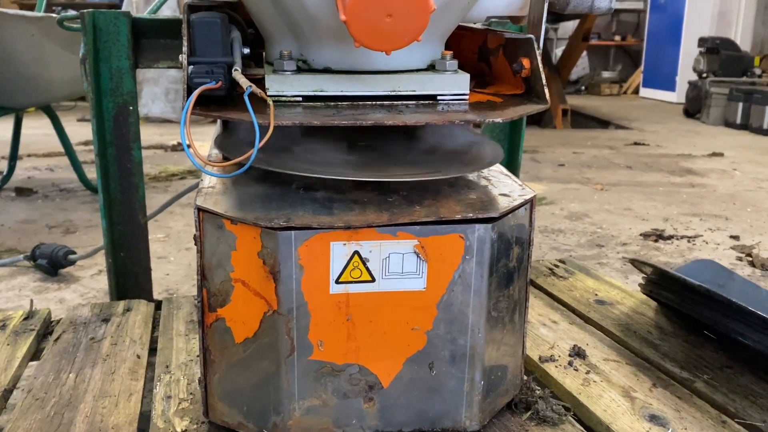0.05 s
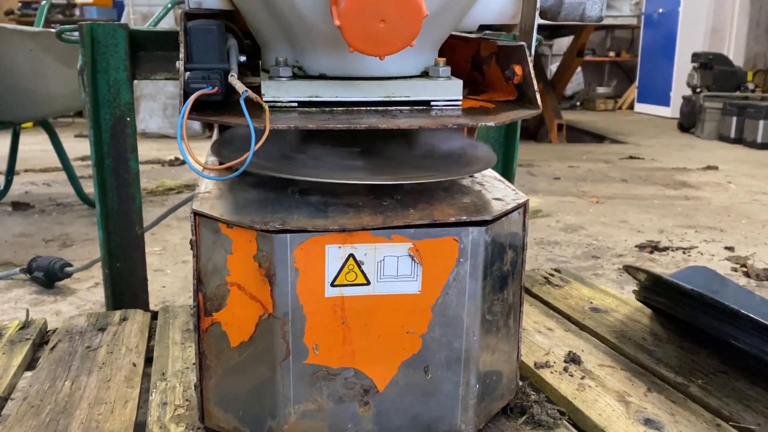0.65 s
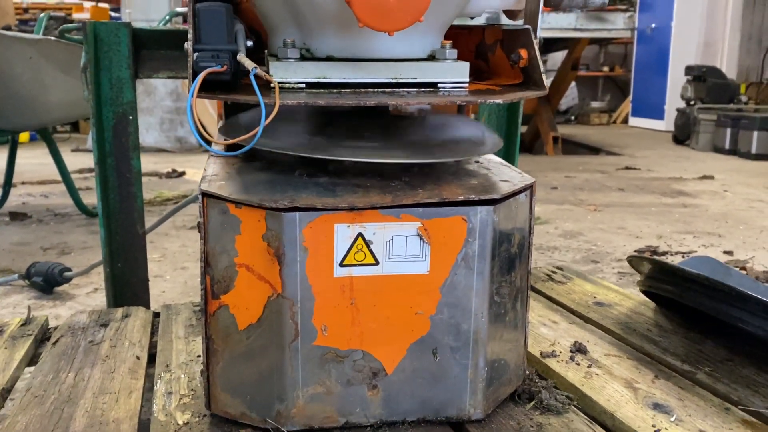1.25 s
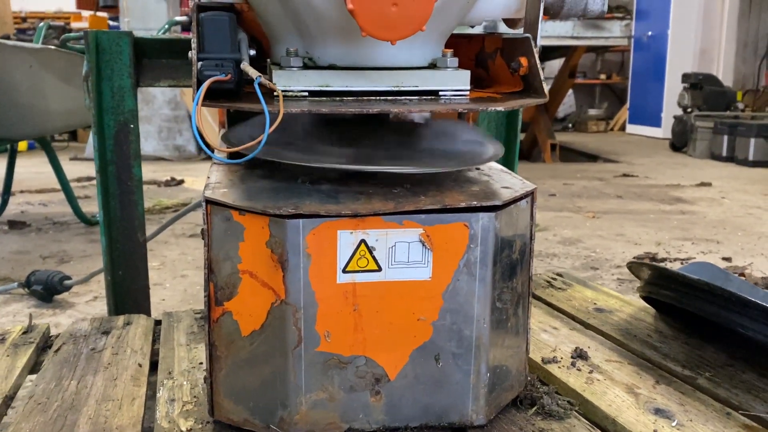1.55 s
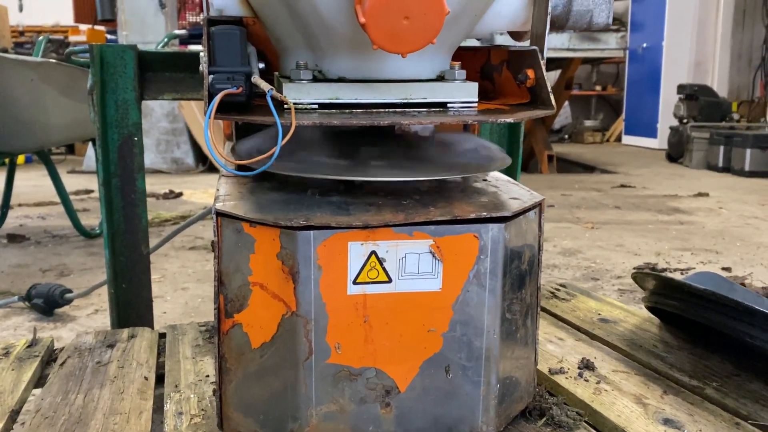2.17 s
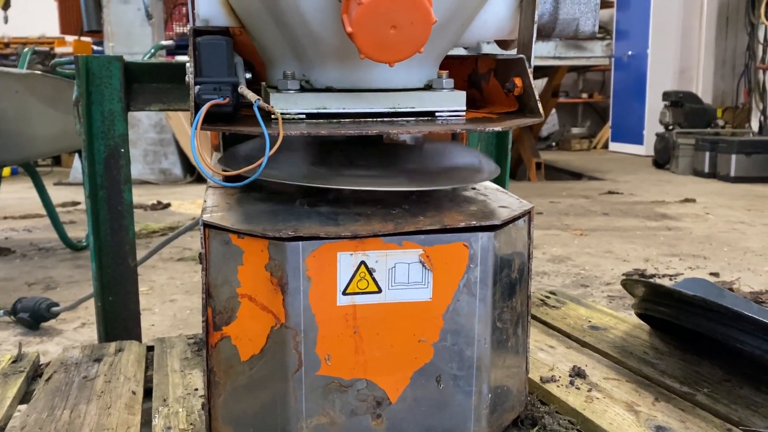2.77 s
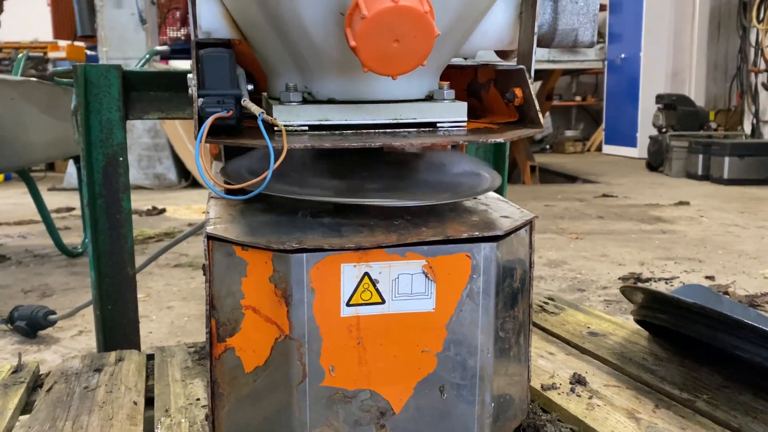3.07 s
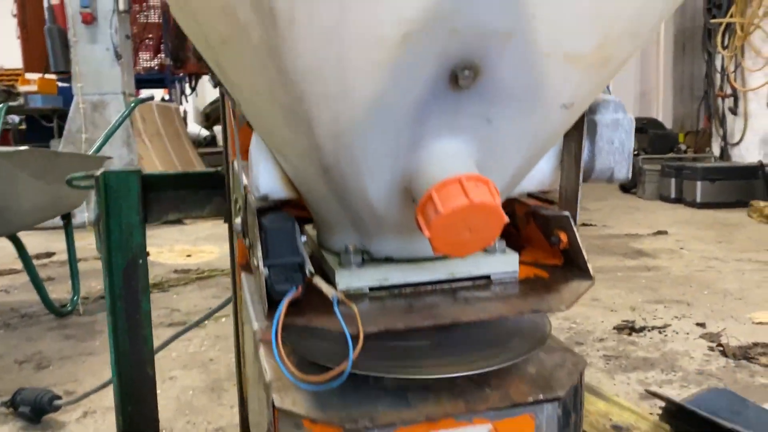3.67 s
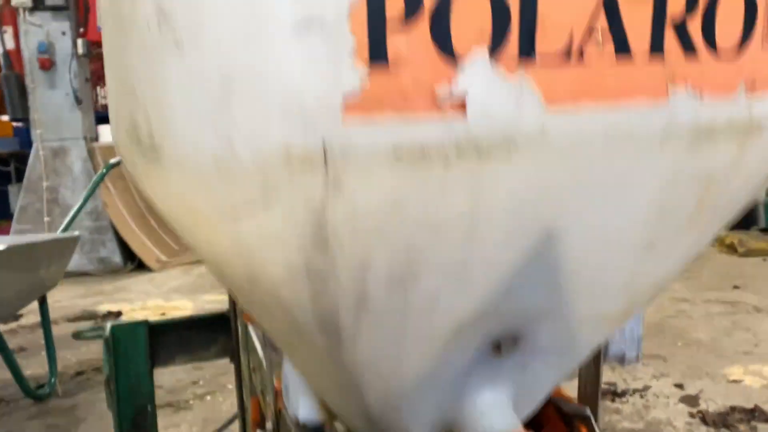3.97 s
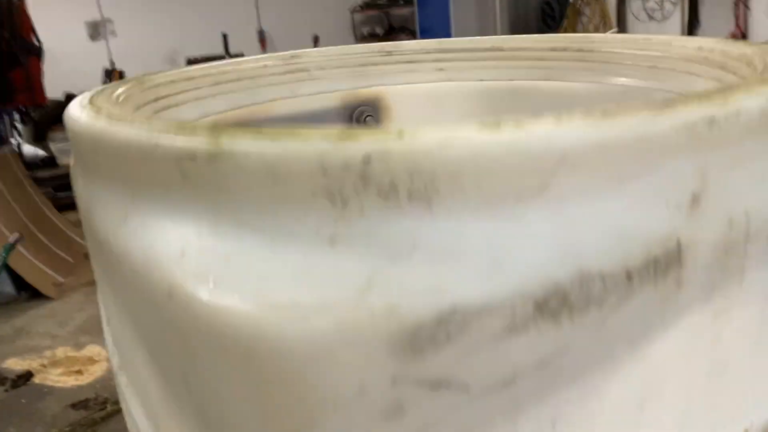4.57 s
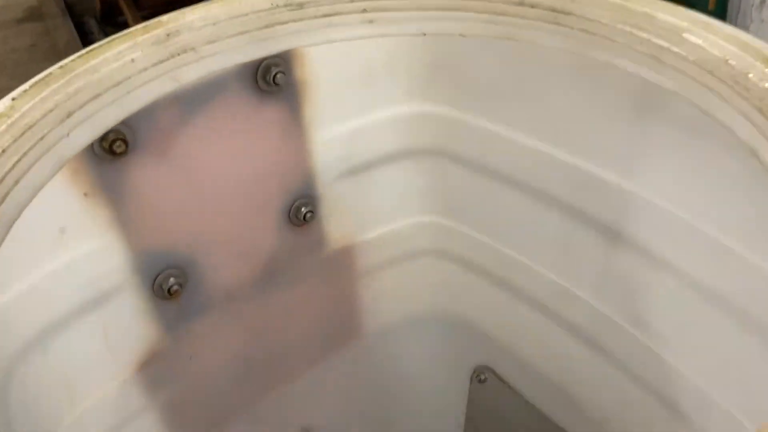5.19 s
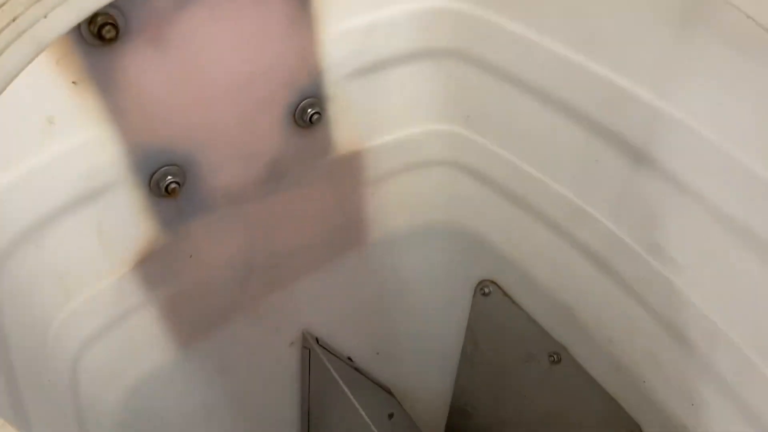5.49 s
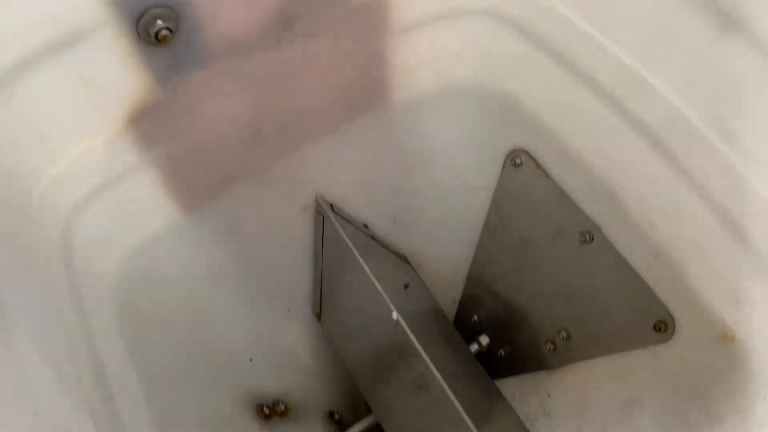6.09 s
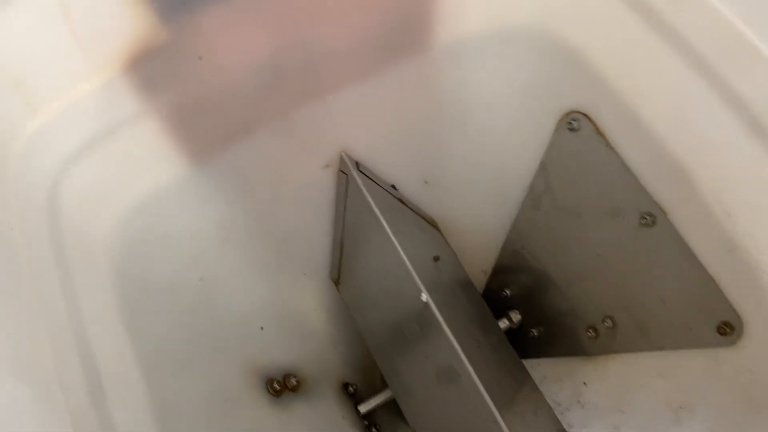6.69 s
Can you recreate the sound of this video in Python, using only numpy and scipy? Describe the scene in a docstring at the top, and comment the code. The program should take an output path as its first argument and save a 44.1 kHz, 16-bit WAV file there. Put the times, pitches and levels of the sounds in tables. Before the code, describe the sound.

A throbbing motor hum and busy metal rattle from a spinning spreader disc, growing louder and ringing over an empty plastic hopper.

```python
"""A throbbing hum and a busy rattle: a motor spins the disc of a spreader in a workshop.
The unbalanced disc shakes the steel frame, the drive chugs and knocks, the bearings hiss and whine,
and now and then a grain of grit ticks on the disc. The microphone starts in front of the steel base,
then rises over the rim of the empty plastic hopper, where hum and rattle boom louder and the air rings."""
import sys
import numpy as np
from scipy import signal
from scipy.fft import rfft, irfft
from scipy.io import wavfile
from scipy.ndimage import uniform_filter1d

SR = 44100
rng = np.random.default_rng(int(sys.argv[2]) if len(sys.argv) > 2 else 0)


def wav_out(sig):
    """Save sig, one row per channel (or a flat mono array), as 16-bit PCM at SR to the path in sys.argv[1]."""
    wavfile.write(sys.argv[1], SR, np.round(np.clip(np.atleast_2d(sig).T, -1, 1) * 32767).astype(np.int16))


N = 306054
T = np.arange(N) / SR
TAPS = 16384
HZ = np.fft.rfftfreq(TAPS, 1 / SR)
IN_STEP_S = .056  # time origin of the drive's swings

# microphone move: t/s, place (0 before the base, 1 by the hopper wall, 2 above its mouth, 3 leaning in)
MIC_PATH = [(3.2, 0.5), (4.1, 1), (4.65, 1.72), (5.2, 2.5), (6.1, 2.5), (6.48, 3)]
# partials of the hum: f/Hz, relative level in front/dB, relative level over the hopper/dB
HUM_LINES = [(50.6, 0, -36), (53.6, -4.5, -16.5), (69.5, -0.5, -3.5), (78.2, 0.5, -1), (83.3, -10.5, -13),
             (86.6, 0, -15), (90, -8, -11), (100.8, -14, -12.5), (116.5, -5.5, -11)]
# partials of the frame's drone: f/Hz, relative level/dB
DRONE_LINES = [(172.6, -12), (232.7, -10), (239.7, 0), (248.6, -12)]
# the drone's fader: t/s, level/dB
DRONE_FADER = [(.1, -33), (.8, -31.5), (1.05, -38.5), (1.35, -35), (1.85, -41), (2.15, -37.5), (3.8, -34),
               (4.1, -29), (4.35, -36), (4.62, -30.5), (5.1, -48), (6.8, -36.5)]
# the motor speeds up and slows down: t/s, lead/turns
MOTOR_LEAD = [(0, -.2), (.55, -.45), (1.6, .1), (2.35, -.1), (2.8, .07), (3.15, .5), (3.5, .73), (4.1, .77),
              (4.5, 1.15), (5.05, 1.33), (5.45, 1.93), (6.65, 1.85), (6.94, 1.9)]
# steady chug of the drive: t/s, depth/dB
CHUG_DEPTH = [(.9, 2.8), (2.5, 1.8), (4.4, 2.8), (5.6, 3.3), (6, 4.5), (6.9, 3.2)]
# faster force swings (negative flips them): f/Hz, multiple of motor lead, knock/dB, chatter/dB
SWINGS = [(26.6, 1, -1.2, -2.2), (38.67, 1, 1.7, 1.2), (53.2, 1, 1.7, 2), (65.27, 1, 2.1, .7),
          (118.47, 2, .9, .9)]
# broad tone of the steel frame and the plastic hopper: f/Hz, gain/dB
FRAME_BODY = [(30, -42), (80, -19), (150, -3), (300, -2.5), (550, -1.5), (1000, -2.5), (1280, -4.5),
              (1470, -11.5), (2100, -10), (2850, -10), (3200, -17), (5200, -15.5), (8300, -33),
              (15500, -35)]
HOPPER_BODY = [(30, -31.5), (80, -4.5), (150, -19.5), (300, -11.5), (550, -17.5), (1000, -15.5),
               (1280, -34), (1470, -29), (2100, -20.5), (2850, -26.5), (3200, -40), (5200, -51),
               (8300, -60), (15500, -69)]
# their resonances and notches: f/Hz, width/Hz, boost/dB
FRAME_MODES = [(173, 16, 11.5), (239, 26, 12), (268, 14, 10), (314, 30, 12), (347, 14, 9), (466, 14, 7),
               (686, 32, 9.5), (770, 22, 7), (951, 18, 8.5), (970, 108, 4.5), (1065, 10, 7),
               (1179, 53, 7.5), (1624, 50, 10), (2050, 150, 5.5), (2510, 110, 4.5), (3050, 130, -5),
               (7700, 900, 4.5), (11200, 830, 7)]
HOPPER_MODES = [(171, 14, 14), (232, 40, 7), (305, 45, 10), (414, 22, 16), (465, 18, 13), (592, 16, 10),
                (647, 16, 11), (710, 28, 11), (750, 26, 7), (819, 28, 7), (868, 44, 8), (960, 34, 8),
                (1097, 35, 10), (1184, 58, 20.5), (1272, 56, 17), (1338, 84, 19), (1984, 55, 12.5),
                (2425, 34, 7), (2550, 40, 4), (2673, 50, 6), (3510, 130, 6)]
# resonances heard near the hopper wall: f/Hz, width/Hz, level/dB
WALL_MODES = [(333, 53, -39.5), (720, 126, -40), (4820, 780, -51.5)]
# bearing whines: f/Hz, width/Hz, level/dB, loudest place, reach/places
WHINES = [(3290, 90, -60, .2, 1), (3520, 80, -57.5, .9, 2.2), (4940, 80, -59, .5, 1),
          (7680, 380, -58, 2.8, .55)]
# heavier knocks and clinks of the drive: t/s, f/Hz, level/dB
KNOCKS = [(.443, 1950, -33), (.452, 720, -30), (1.157, 960, -27), (1.562, 2140, -33), (1.673, 945, -24),
          (2.806, 1980, -31), (4.457, 2700, -31), (4.519, 718, -16.5), (4.607, 715, -23), (4.917, 825, -24),
          (5.332, 840, -16), (5.38, 735, -17), (6.512, 770, -18), (6.569, 725, -13.5), (6.608, 2840, -26),
          (6.83, 1990, -23)]
# grit hitting the disc: t/s, level/dB
GRIT_HITS = [(.4474, -29), (.8071, -21), (2.0919, -17), (2.2130, -24), (3.6024, -32.5), (4.0706, -33.5)]
# the grit's bright tone: f/Hz, gain/dB
GRIT_EQ = [(1000, -14), (3500, 0), (15000, 1.5)]
# single pitches flaring in the rattle: middle t/s, length/s, f/Hz, width/Hz, level/dB
FLARES = [(1.593, 0.36, 2230, 550, -42), (3.316, 1, 2520, 620, -44.5), (3.563, 0.72, 343, 36, -36),
          (3.935, 0.194, 411, 28, -32.5), (4.077, 0.25, 3520, 170, -49), (4.126, 0.28, 766, 40, -33),
          (5.14, 0.59, 1178, 26, -31)]
# brief dips of rattle and hopper notes: middle t/s, length/s, gain/dB
LULLS = [(2.163, 0.038, -2.5), (3.86, 0.12, -1.5), (4.5, 0.03, -4), (4.9, 0.043, -2.5), (5.645, .05, -2),
         (6.845, 0.18, -2.5)]
# notes of the hopper's air, a swing's rate apart: f/Hz, multiple of motor lead, relative level/dB
HOPPER_NOTES = [(711.03, -1, -1.5), (749.7, 0, -1), (814.97, 1, -2.5)]
# their fader: t/s, level/dB
HOPPER_FADER = [(3.7, -65), (4.3, -39), (4.62, -33.5), (5.8, -28), (6.55, -23), (6.9, -27)]
# resonances deep in the hopper: f/Hz, width/Hz, level/dB, place where they open
INNER_MODES = [(310, 53, -31.5, 2.68), (2800, 200, -39, 2.8), (10500, 3000, -61, 2.7)]
# stereo width, widest in the hiss: f/Hz, side level against the middle/dB
STEREO_WIDTH = [(110, -18.5), (200, -13), (380, -11), (700, -4), (1290, -4.5), (2380, -3), (4400, -2),
                (8000, 1)]
# panning of frame and hopper: f/Hz, left minus right/dB
FRAME_PAN = [(700, -0.5), (1300, 1), (4400, 4), (8000, 0.5)]
HOPPER_PAN = [(380, 0.23), (700, 6.8), (1300, 1.4), (4400, 0.33)]


def amp(db):
    """Decibels to gain."""
    return 10 ** (np.asarray(db) / 20)


def unit_rms(x):
    """Scales to an rms of 1."""
    return x / np.sqrt(np.mean(x ** 2) + 1e-20)


def curve(rows):
    """Automation: straight lines through (t/s, value) rows."""
    return np.interp(T, *np.transpose(rows))


def eq(points):
    """Joins (f/Hz, gain/dB) rows on a log-frequency axis."""
    hz, db = np.transpose(points)
    return np.interp(np.log(HZ + 1), np.log(hz), db)


def arch(s, length):
    """A swell from 0 to 1 and back, peaking at time s."""
    return np.cos(np.pi * np.clip((T - s) / length, -.5, .5))


def drift(rate_hz):
    """Smooth random modulation of rms 1."""
    coarse = T[::64]
    hz = np.fft.rfftfreq(len(coarse), coarse[1])
    spectrum = rfft(rng.standard_normal(len(coarse))) * np.exp(-(hz / rate_hz) ** 2) * (hz > 0)
    return np.interp(T, coarse, unit_rms(irfft(spectrum, len(coarse))))


def band(x, edge_hz, kind):
    """Steep causal filter."""
    return signal.sosfilt(signal.butter(6, edge_hz, kind, fs=SR, output="sos"), x)


def ring(x, db):
    """Minimum-phase EQ with the gain curve db: its peaks ring after each blow."""
    log_gain = np.log(amp(np.r_[db, db[-2:0:-1]]))
    response = np.fft.ifft(np.exp(np.conj(signal.hilbert(log_gain)))).real
    return signal.oaconvolve(x, response[:TAPS // 2])[:N]


def tone(hz, wander, waver_db):
    """A partial that wanders in phase (turns) and wavers in level."""
    strength = amp(waver_db * drift(rate_hz=5))
    return strength * np.cos(2 * np.pi * (hz * T + rng.random() + wander * drift(rate_hz=.92)))


def resonance(shake_db, hz, width):
    """Noise ringing at one pitch, its level shaken by shake_db."""
    peak_db = -20 * np.log10(1 + 2 * ((HZ - hz) / width) ** 2)
    return unit_rms(ring(rng.standard_normal(N), peak_db) * amp(shake_db))


def past(place, blur):
    """Fades from 0 to 1 as the microphone passes a place."""
    return 1 / (1 + np.exp((place - curve(MIC_PATH)) / blur))


def near(place, reach):
    """Nearness of the microphone to a place, 0 to 1."""
    return np.exp(-((curve(MIC_PATH) - place) / reach) ** 2)


def over_rim():
    """Crossfade from frame (0) to hopper (1)."""
    return past(1.69, blur=.26)


def by_wall():
    """Nearness to the hopper's outer wall, 0 to 1."""
    return near(1, reach=.47)


def mic_gain(front_db, mouth_db, lean_db):
    """A layer's gain: steady in front, growing past the rim as the microphone leans in."""
    over = over_rim()
    inside_db = mouth_db + lean_db * (curve(MIC_PATH) - 2)
    return amp((1 - over) * front_db + over * inside_db)


def disc_hum():
    """The unbalanced disc shakes the frame; the hopper's air favours the partials near 77 Hz."""
    over = past(1.9, blur=.12)
    gains = np.array([amp(front + (top - front) * over) for _, front, top in HUM_LINES])
    partials = np.array([tone(hz, wander=.05, waver_db=1.1) for hz, _, _ in HUM_LINES])
    hum = unit_rms((gains * partials).sum(0) / np.linalg.norm(gains, axis=0))
    spot_db = 3 * by_wall() - 3.5 * near(2.01, reach=.42)  # the wall radiates; the rim has a quiet spot
    return mic_gain(front_db=-39.5, mouth_db=-31.5, lean_db=13.5) * amp(spot_db) * hum


def frame_drone():
    """The frame sings along with the drive, swelling and sinking."""
    partials = sum(amp(db) * tone(hz, wander=.12, waver_db=1.8) for hz, db in DRONE_LINES)
    return amp(curve(DRONE_FADER)) * unit_rms(partials)


def drive_force(chug_hz=12.07):
    """Contact force in dB, for knock and chatter: a steady chug plus swings that follow the motor."""
    t, lead = T - IN_STEP_S, curve(MOTOR_LEAD)
    chug = curve(CHUG_DEPTH) * np.cos(2 * np.pi * chug_hz * t)
    chug_db = np.outer([1, .25], chug)  # the chatter gets a quarter of the chug
    swing_db = sum(np.outer(depths_db, np.cos(2 * np.pi * (hz * t + k * lead)))
                   for hz, k, *depths_db in SWINGS)
    return chug_db + swing_db + .13 * drift(rate_hz=9)


def contacts(knock_db, chatter_db, firm):
    """One soft scuff at each crest of the force, amid many small touches."""
    crests = signal.argrelmax(knock_db)[0]
    jitter = rng.normal(0, .00035 * SR, len(crests)).astype(int)
    blows = np.zeros(N)
    blows[np.clip(crests + jitter, 0, N - 1)] = amp(.4 * knock_db[crests])
    # sheet metal carries highs faster than lows, so each blow smears into a falling sweep
    t = T[:round(.012 * SR)]
    sweep = signal.chirp(t, 1500, t[-1], 300) * signal.windows.tukey(len(t))
    scuffs = unit_rms(signal.oaconvolve(blows, sweep, "same"))
    touches = rng.standard_normal(N)
    lows = unit_rms(band(touches * amp(.44 * knock_db), 1372, "low"))
    highs = unit_rms(band(touches * amp(.17 * chatter_db), 1726, "high"))
    return unit_rms(firm * scuffs + lows) + 3.04 * highs


def wall_ripple(depth_db=2, centre_hz=1800):
    """A wall's many small resonances, as random EQ peaks and dips in dB."""
    log_hz, grid = np.log(HZ + 1), np.arange(0, np.log(SR), .012)
    heights = unit_rms(np.interp(log_hz, grid, rng.standard_normal(len(grid))))
    return depth_db * heights * np.exp(-(log_hz - np.log(centre_hz)) ** 2)


def throb(x, edges_hz, db):
    """Pumps one band of x by db."""
    part = signal.sosfiltfilt(signal.butter(3, edges_hz, "band", fs=SR, output="sos"), x)
    return x + part * (amp(db) - 1)


def rattle(knock_db, chatter_db, body, modes, firm, press):
    """Contacts ring one part of the machine; on top, the bearings hiss through the same part."""
    modes_db = sum(boost / (1 + (2 * (HZ - hz) / width) ** 2) for hz, width, boost in modes)
    colour_db = eq(body) + wall_ripple() + modes_db
    blows = band(ring(contacts(knock_db, chatter_db, firm), colour_db), 3570, "low")
    # the walls sound louder while the parts press together
    blows = throb(blows, [620, 980], press * knock_db)
    blows = throb(blows, [1800, 3200], .66 * chatter_db)
    blows /= np.std(band(blows, [280, 3200], "band"))
    blows *= amp(.5 * by_wall() + 1.5 * arch(2.55, length=1.76) + lulls())
    flutter = rng.standard_normal(N) * amp(1.2 * drift(rate_hz=46))
    hiss = unit_rms(band(ring(flutter, colour_db), 3695, "high"))
    return (mic_gain(front_db=-31, mouth_db=-26, lean_db=5) * blows
            + mic_gain(front_db=-51, mouth_db=-49, lean_db=2.5) * hiss)


def floor_echo(x):
    """The floor's echo lags more as the microphone rises, sweeping a comb down the sound."""
    delay_s = .001466 + .0016 * curve(MIC_PATH)
    gain = .97 * over_rim()
    return (x + gain * np.interp(T - delay_s, T, x)) / np.sqrt(1 + gain ** 2)


def workshop(x, t60):
    """Short, dense reverb from floor, benches and walls."""
    t = T[:TAPS]
    tail = rng.standard_normal(TAPS) * amp(-60 * t / t60) * (t > .002)
    return signal.oaconvolve(x, tail / np.linalg.norm(tail))[:N]


def stereo(middle, pan_db):
    """A diffuse side signal widens the image; pan_db tilts each frequency left or right."""
    side = ring(workshop(middle, t60=.14), eq(STEREO_WIDTH))
    return np.array([ring(middle + side, pan_db / 2), ring(middle - side, -pan_db / 2)])


def wall_ring(chatter_db):
    """The chatter rings the hopper's wall, loudest as the microphone passes it."""
    return by_wall() * sum(amp(db) * resonance(chatter_db, hz, width) for hz, width, db in WALL_MODES)


def bearing_whines():
    """Faint narrow hisses that waver in pitch and level, each heard best from one place."""
    out = np.zeros(N)
    for hz, width, db, place, reach in WHINES:
        warped_s = T + np.cumsum(.006 * drift(rate_hz=1.5)) / SR
        whine = resonance(2.5 * drift(rate_hz=7), hz, width)
        out += amp(db) * near(place, reach) * np.interp(warped_s, T, whine, left=0, right=0)
    return out


def knocks(attack_s=.0013, decay_s=.02):
    """A heavier blow of the drive rings one pitch, wrapped in a short rough clatter."""
    out = np.zeros(N)
    for s, hz, db in KNOCKS:
        age = np.maximum(T - s, 0)
        envelope = amp(db) * (1 - np.exp(-age / attack_s)) * np.exp(-np.minimum(age / decay_s, 20))
        clatter = .4 * resonance(0, hz, width=.23 * hz)
        out += envelope * (np.sin(2 * np.pi * hz * age) + clatter)
    return out


def grit_ticks(attack_s=.0008, decay_s=.0018):
    """Each grain cracks against the spinning steel and skitters for a few milliseconds."""
    envelope = np.zeros(N)
    for s, db in GRIT_HITS:
        age = np.maximum(T - s, 0)
        envelope += amp(db) * (1 - np.exp(-age / attack_s)) * np.exp(-age / decay_s)
    channels = [ring(envelope * rng.standard_normal(N), eq(GRIT_EQ)) for _ in range(2)]
    return np.array([x + amp(-11) * workshop(x, t60=.2) for x in channels])


def flares(chatter_db):
    """Now and then one ringing pitch swells out of the rattle and sinks back."""
    return sum(amp(db) * arch(s, length) * resonance(chatter_db, hz, width)
               for s, length, hz, width, db in FLARES)


def lulls():
    """Brief dips in level, in dB."""
    return sum(db * arch(s, length) for s, length, db in LULLS)


def hopper_ring(knock_db):
    """The knocking feeds three notes of the hopper's air, which beat in step with its swings."""
    t, lead = T - IN_STEP_S, curve(MOTOR_LEAD)
    turns = rng.random() + .5 * drift(rate_hz=3)
    notes = sum(amp(db) * np.cos(2 * np.pi * (hz * t + k * lead + turns)) for hz, k, db in HOPPER_NOTES)
    feed_db = 1.5 * uniform_filter1d(knock_db, round(.018 * SR))
    return amp(curve(HOPPER_FADER) + lulls()) * unit_rms(notes * amp(feed_db))


def inner_ring(chatter_db):
    """Resonances inside the hopper open up as the microphone leans in."""
    return sum(amp(db) * past(place, blur=.091) * resonance(.5 * chatter_db, hz, width)
               for hz, width, db, place in INNER_MODES)


def scene():
    """The mix: the frame gives way to the hopper as the microphone rises."""
    over = over_rim()
    knock_db, chatter_db = drive_force()
    frame = rattle(knock_db, chatter_db, FRAME_BODY, FRAME_MODES, firm=.33, press=.056)
    hopper = rattle(knock_db, chatter_db, HOPPER_BODY, HOPPER_MODES, firm=.4, press=.45)
    accents = knocks() + flares(chatter_db)
    front = np.sqrt(1 - over) * floor_echo(frame) + (1 - over) * accents
    inside = np.sqrt(over) * hopper + over * accents + hopper_ring(knock_db)
    drive = stereo(front, eq(FRAME_PAN)) + stereo(inside, eq(HOPPER_PAN))
    bed = disc_hum() + frame_drone() + wall_ring(chatter_db) + inner_ring(chatter_db) + bearing_whines()
    return drive + stereo(bed, pan_db=np.zeros_like(HZ)) + grit_ticks()


def record(dry):
    """A steep high cut at 15.9 kHz."""
    high_cut = signal.firwin(511, 15900, window=("kaiser", 9), fs=SR)
    return signal.oaconvolve(dry, high_cut[None], "same")


dry = scene()
out = record(dry)
wav_out(out)
```